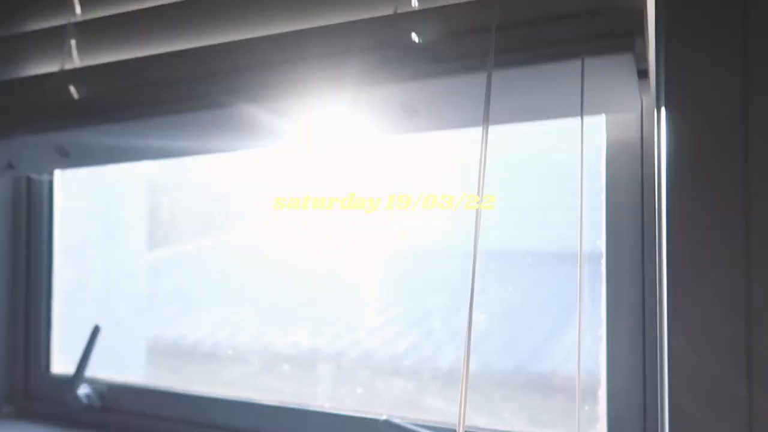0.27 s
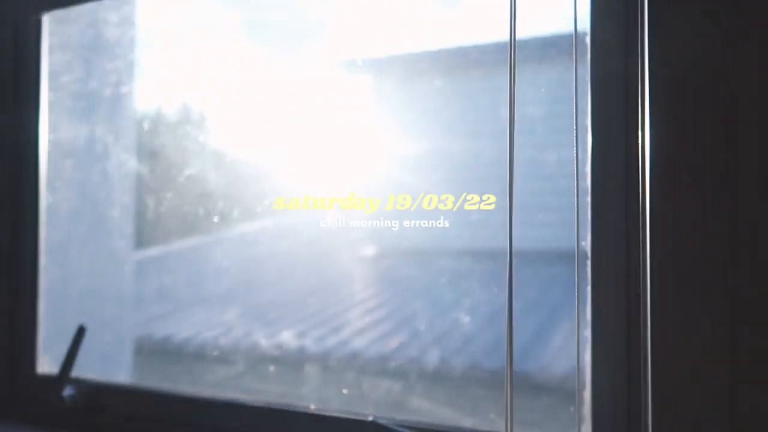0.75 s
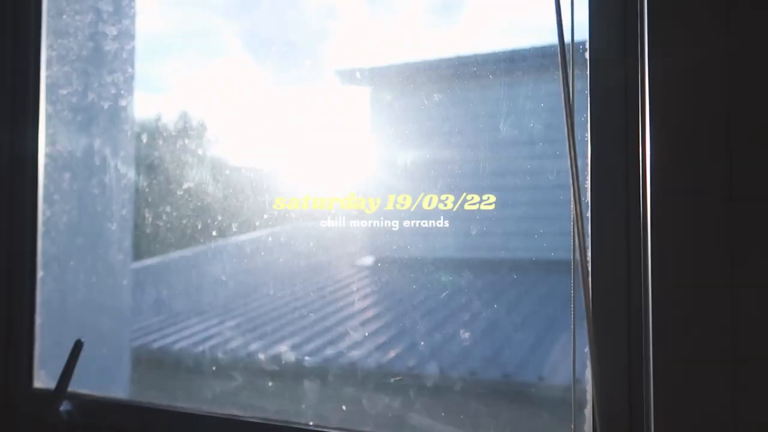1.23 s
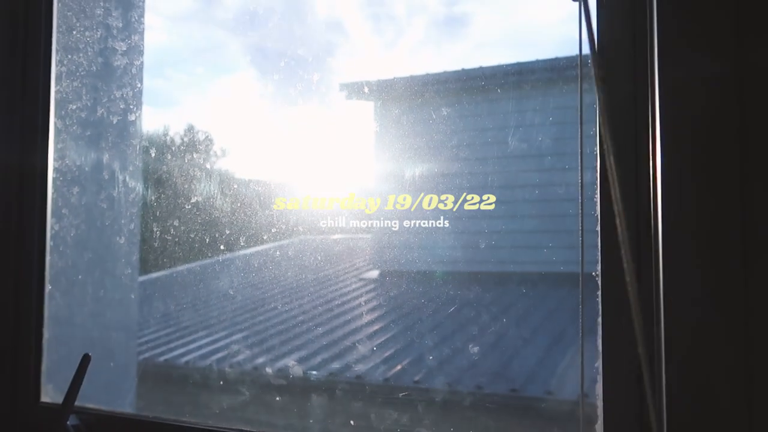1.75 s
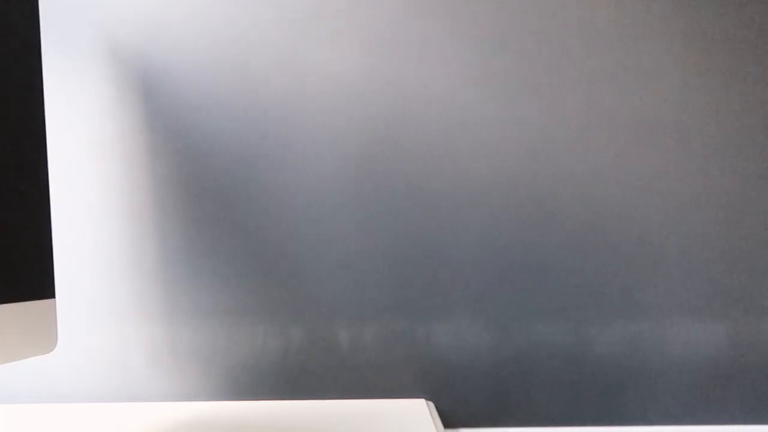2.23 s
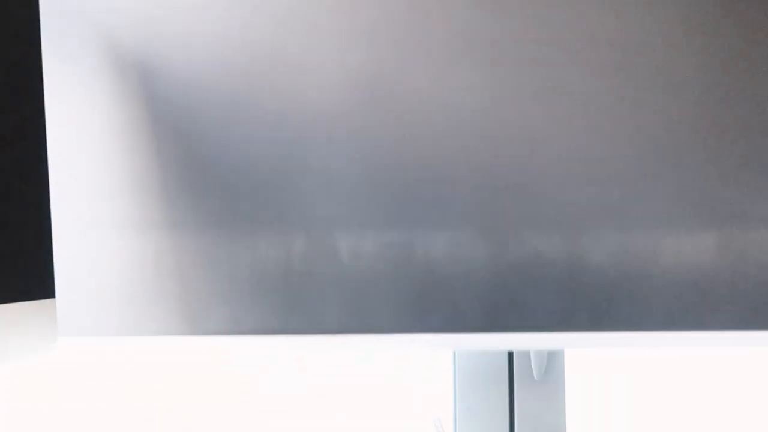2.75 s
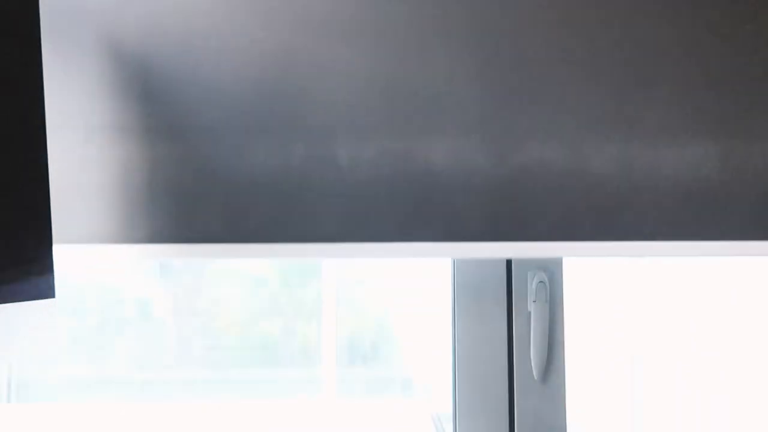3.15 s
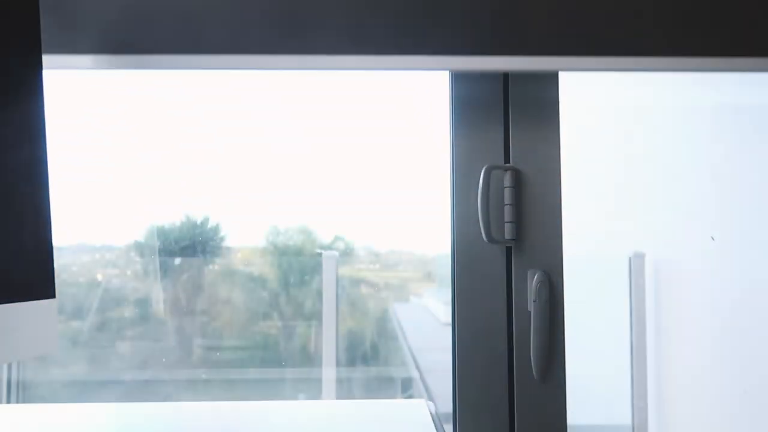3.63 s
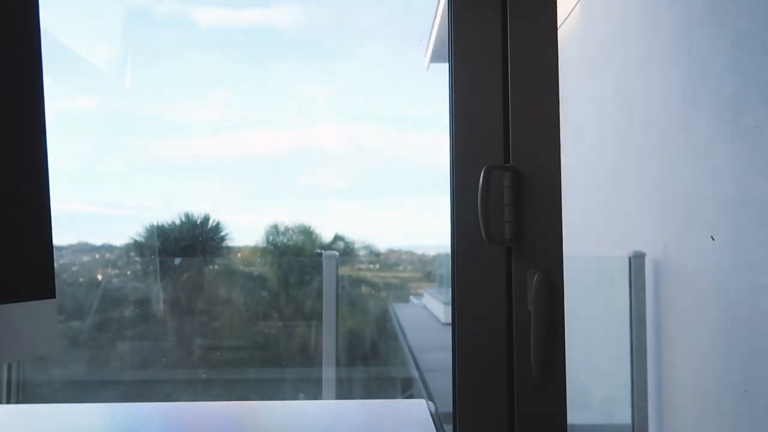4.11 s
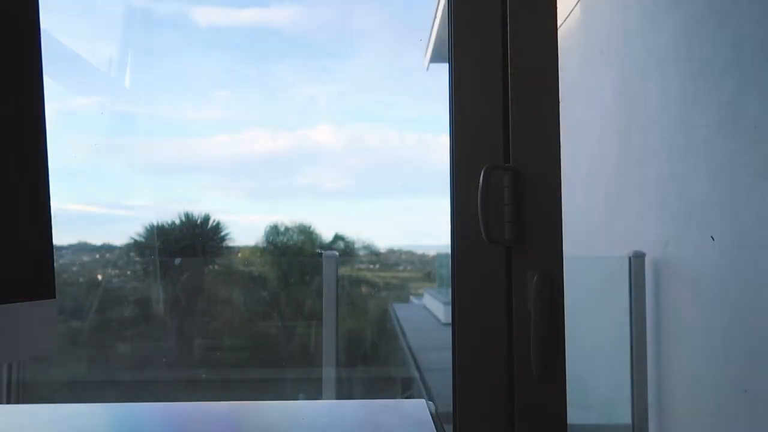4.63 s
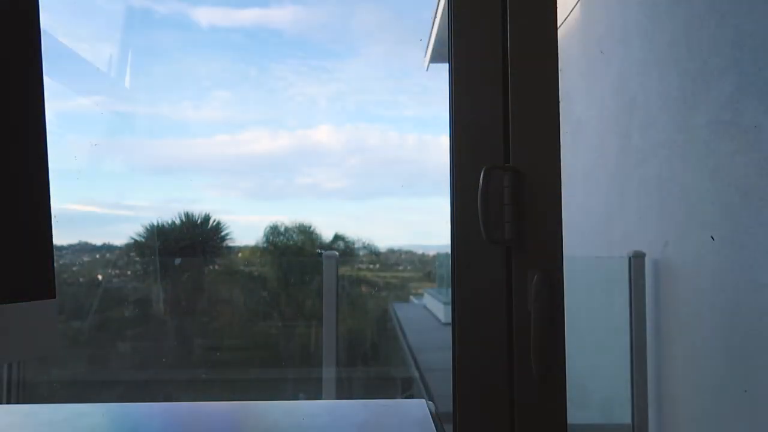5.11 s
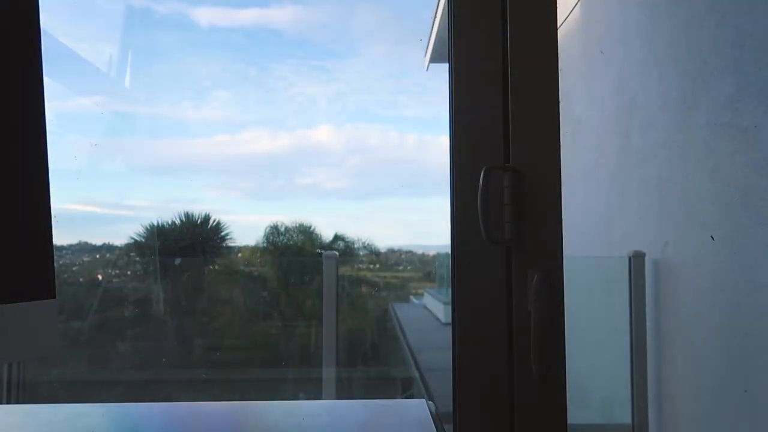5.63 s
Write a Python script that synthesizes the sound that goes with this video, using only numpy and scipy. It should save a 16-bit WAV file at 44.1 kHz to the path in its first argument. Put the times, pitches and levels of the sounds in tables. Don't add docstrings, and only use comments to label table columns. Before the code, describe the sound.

Close indoor handling: slats clatter and cord squeaks, a quiet pause, then a jerky chain-driven roller blind rasps, jolts and knocks its frame.

```python
import sys
import numpy as np
from scipy import signal
from scipy.fft import rfft, irfft, next_fast_len
from scipy.io import wavfile
from scipy.ndimage import uniform_filter1d

SR = 44100
rng = np.random.default_rng(int(sys.argv[2]) if len(sys.argv) > 2 else 0)


def elevation(decibels):
    levels = np.asarray(decibels, float)
    return 10 ** (levels / 20)


def put_to_file(sound):
    columns = np.atleast_2d(sound).T
    safe = np.clip(columns, -1, 1)
    whole_steps = np.round(safe * 32767)
    wavfile.write(sys.argv[1], SR, whole_steps.astype(np.int16))


N = 258514
TIME = np.arange(N) / SR
CUT_S = 2.14
FADE_FROM_S, FADE_DB_PER_S = 5.786, -110
AIR_DB = -52.5
HOLD = 1.274
HARD_T60_S, SOFTER_S_PER_DB = 0.043, 0.5
RAIL_DAMP_S = 0.66
BAR_HZ, BEAD_HZ, COG_HZ = 2040, 2500, 3050

# start/s, length/s, peak level/dB, brightness/dB, swell/share of length
CORD_HAULS = [
    (-.04, 0.086, -27.5, 6.5, 0.35),
    (-.04, 0.55, -32, 6, 0.1),
    (.2, 0.63, -33.5, 3, 0.43),
    (.5, 0.69, -38.5, 3, .5),
    (.95, .45, -39.5, 1.5, 0.68),
    (1.22, 0.13, -39.5, 9.5, 0.8),
    (1.33, 0.15, -34.5, -4, 0.34),
    (1.45, 0.22, -60, 5, .1),
    (1.93, 0.28, -38.5, -5.5, 0.69),
]
# start/s, length/s, peak level/dB, brightness/dB, swell/share of length
CHAIN_PULLS = [(2.14, 0.12, -35.5, -1.5, 0.033), (2.2, 0.29, -38.5, 10.5, 0.74),
               (2.38, 0.19, -39, 12.5, 0.35), (2.56, 0.3, -46, 6, 0.39), (2.75, 0.33, -42, -0.5, 0.082),
               (3.05, 0.21, -48, -4, 0.31), (3.18, 0.19, -38, -2, 0.33), (3.3, 0.12, -41, 3, 0.32),
               (3.385, .17, -33, 0.5, 0.056), (3.46, 0.22, -28, 1, 0.61), (3.64, 0.2, -35.5, 6.5, .55),
               (3.77, .19, -33, 0, 0.3), (3.92, 0.3, -35.5, 8, 0.31), (4.212, .18, -35.5, -1, 0.2),
               (4.36, 0.34, -40, 0.5, 0.37), (4.652, .13, -35.5, 13, 0.056), (4.762, 0.25, -31, 5.5, 0.054),
               (4.8, 0.23, -29.5, 2, 0.38), (5.16, 0.27, -38, -2.5, 0.59), (5.392, 0.17, -30.5, -6.5, 0.16),
               (5.578, 0.082, -34.5, -12, 0.33), (5.66, 0.16, -45, -32, .5)]
# start/s, length/s, peak level/dB, brightness/dB, swell/share of length
SLEEVE_BRUSH = [
    (0.97, 0.39, -42.5, 0, 0.8),
]
RUB_EDGES_HZ = [30, 250, 1500, 3500, 16000]
# level re stroke/dB, slope/dB per dB brightness, steepness/1, rest level/dB
CORD_ANSWER = [
    (-14.5, -0.5, 1.1, -64),
    (0.74, -0.21, 1.1, -73),
    (-0.37, 0.43, 1.14, -71),
    (-8.5, 0.85, 1.5, -87),
]
CHAIN_ANSWER = [
    (-10.5, -0.41, 0.76, -45.5),
    (-0.64, -0.1, 1.2, -51),
    (-3.5, 0.4, 1.02, -50.5),
    (-13.5, 1, 0.94, -63),
]
# f/Hz, level/dB per Hz
RAIL_COLOUR = [(59, -51), (100, -19), (123, -19), (181, -10.5), (258, -15.5), (370, -2.5), (490, -10.5),
               (600, -13), (774, 4), (1370, -10.5), (1880, -17), (2320, -7), (5070, -27.5), (6260, -21),
               (15500, -53.5)]
# f/Hz, level/dB per Hz
TUBE_COLOUR = [(18, -43), (30, -13), (59, 1), (173, -7), (208, -3), (243, -5.5), (532, 1), (691, 1.5),
               (1050, -5), (1650, -22.5), (2990, -26.5), (7460, -41), (15500, -57)]
RAIL_MODES_HZ = [767, 818, 858, 1040]
# t/s, crack level/dB, ring f/Hz, body level/dB, snap level re crack/dB
SLAT_CLICKS = [(.0385, -17, 2510, -40, -18), (.052, -34, 2310, -46, -12), (.0952, -32, 2440, -37, -10),
               (.1173, -25, 2370, -31, -12), (.2164, -25, 3300, -42, -4), (.2566, -19, 2240, -36, -12),
               (.3318, -22, 2410, -31, -7), (.4439, -30, 2380, -39, -8), (.4594, -26, 2420, -40, -8),
               (.4746, -18, 2480, -22.5, 8.5), (.6026, -10.5, 2620, -25, 3), (.6769, -26, 2310, -31, -9),
               (.6988, -25, 2500, -36, -6), (.9175, -32, 1400, -35, -6), (.9358, -36, 2420, -33, -8),
               (1.0215, -24, 2500, -35.5, -10), (1.077, -35, 2400, -49, -8), (1.1014, -38, 2420, -56, -8),
               (1.161, -33, 2500, -36, -6), (1.346, -30, 2260, -27, 8), (1.3614, -30, 1640, -21.5, 2),
               (1.3733, -34, 1760, -21, -4), (1.3972, -29, 2080, -19.5, -3),
               (2.1215, -16.5, 2250, -24, -22)]
# t/s, crack level/dB, body level/dB, snap level re crack/dB
BAR_TAPS = [(2.5151, -26, -24, 0), (2.6543, -28.5, -42, -4), (2.8364, -39, -48, -6),
            (3.2465, -35.5, -25.5, -7), (4.9406, -16, -38, -9), (5.1377, -9.5, -18, -15),
            (5.2823, -27, -45, -2), (5.3217, -29, -34.5, -10), (5.3986, -41, -37, 6),
            (5.5861, -29, -33.5, -15), (5.6265, -34.5, -33, -25)]
BEAD_CATCHES = [(2.2602, -31, -33.5, -4), (2.2896, -30, -55, -11), (2.4143, -29, -56, -11),
                (2.777, -37, -31, 2), (3.0274, -41, -42, -13), (3.1347, -34.5, -52, -12),
                (3.3931, -37, -36.5, -10), (3.9464, -24.5, -39, -12), (3.9997, -25, -48, -5),
                (4.0297, -21.5, -33, -30), (4.2207, -30, -33, -6), (4.2442, -27, -25, -10),
                (4.4103, -31, -42, 1), (4.5749, -29.5, -52, -23), (4.6592, -24, -47, -22)]
COG_CLICKS = [
    (3.5258, -30, -32, -4),
    (3.6693, -26.5, -48, -10),
    (3.7536, -34, -34, -10),
    (3.7723, -23.5, -40, -10),
    (3.8185, -23, -46, -10),
    (3.8429, -27, -41, -12),
    (4.096, -22.5, -35, -31),
    (4.2826, -28, -27.5, 5),
    (4.7685, -23.5, -46, -27),
    (4.9685, -20, -46, -4),
]
# t/s, peak level/dB
BAR_KNOCKS = [
    (2.5154, -13),
    (5.1381, -10.5),
]
# f/Hz, level/dB, t60/s
BAR_MODES = [
    [(77.5, -3, 0.33), (135.3, 1.5, 0.2), (217, 0, 0.15), (402, -1, 0.17), (957, -4, 0.091)],
    [(139.5, -6, 0.19), (372, -4, 0.22), (415, -9, 0.19), (553, -35, 5.0), (653, -7, 0.14),
     (947, -18, 0.28), (1550, -25, 1.1), (1760, -25, 0.047), (933, -17, 0.19), (1030, -15, .2),
     (2140, -18, .1)],
]
# f/Hz, level/dB per Hz
THUD_COLOURS = [
    [(29, -35), (50, 0), (119, -4), (361, -4), (700, -12.5), (1120, -21), (1650, -13.5), (9000, -49),
     (11700, -101), (19800, -120)],
    [(29, -51), (50, -37), (125, -8), (385, -8), (473, -7.5), (780, -6.5), (4910, -29.5), (12000, -51),
     (15600, -104), (22000, -120)],
]
# f/Hz, level/dB, t60/s
BAR_EDGES = [
    (1080, -4.5, 0.027),
    (2095, 6.5, 0.017),
]
# t/s, peak level/dB, f/Hz, t60/s
TUBE_JOLTS = [(2.305, -29, 380, .08), (2.375, -27, 360, .1), (2.518, -15, 1000, .03),
              (2.654, -30, 900, .02), (2.7745, -19, 520, 0.014), (3.213, -23, 406, 0.029),
              (3.2475, -21, 700, .02), (3.257, -22, 435, 0.027), (3.39, -20.5, 1025, 0.046),
              (3.5955, -12, 1200, .008), (4.245, -23, 900, .02), (4.422, -22, 557, 0.053),
              (5.235, -25.5, 135, .15), (5.405, -26.5, 119, 0.16)]
# t/s, level/dB, length/s, fade/share of length
CHAIN_TUGS = [
    (3.527, -32.5, 0.1, 0.22),
    (3.767, -36.5, 0.26, 0.67),
    (4.658, -27, 0.13, 0.73),
    (4.759, -41.5, 0.23, 0.28),
    (5.395, -35.5, 0.16, 0.82),
]
# t/s, peak level/dB, f/Hz, length/s, glide/share of f
SQUEAKS = [
    (.232, -25, 1098, 0.053, 0.1),
    (.362, -28, 1241, 0.041, 0.32),
    (.49, -27.5, 1312, 0.035, 0.038),
    (.62, -25.5, 1350, 0.042, -0.084),
    (.752, -21, 1327, 0.0382, 0.274),
    (.911, -24, 1322, 0.043, -0.21),
]
# t/s, peak level/dB, f/Hz, length/s, glide/share of f
GUIDE_WHISTLES = [
    (.602, -32.5, 8590, 0.0097, -0.0013),
    (1.133, -33.5, 1760, 0.037, 0.033),
    (1.235, -43, 4040, 0.031, 0.037),
    (1.438, -31.5, 2317, 0.02, -0.012),
    (1.46, -35.5, 2320, 0.016, 0.014),
    (1.96, -40, 930, 0.19, 0.083),
    (3.8, -42, 3500, .08, -.03),
    (5.428, -31, 2630, 0.026, 0.023),
]
# t/s, peak level/dB, f/Hz, length/s, glide/share of f
RAIL_HUMS = [(.004, -29.5, 790, 0.15, 0.028), (.055, -36.5, 379.3, 0.1, .02), (.155, -29, 749, 0.067, .02),
             (.2, -40, 352, .11, -0.014), (.255, -28.5, 865, .06, 0), (.315, -33.5, 793, 0.066, -0.027),
             (.39, -34, 857, .06, 0.097), (.46, -36.5, 807, .05, .08), (.53, -35, 870, 0.11, 0.062),
             (.69, -33, 857, 0.045, .05), (.73, -30.5, 860, 0.04, 0.052), (1.358, -22, 1010, .012, -0.2),
             (1.366, -18, 847, 0.023, -0.028), (1.395, -19.5, 823, 0.018, -0.068),
             (1.42, -34, 1000, 0.022, 0.22)]
# t/s, level/dB, length/s
EDGE_FLICKS = [
    (0.034, -24, 0.0033),
    (0.118, -27, 0.003),
    (2.119, -34, 0.011),
    (2.289, -43, 0.0092),
    (2.776, -43, .008),
    (3.386, -41, 0.012),
    (3.772, -33.5, 0.025),
    (3.944, -32.5, 0.011),
]
# t/s, peak level/dB, f/Hz, t60/s
PAWL_PINGS = [(.0340, -24, 7630, .006), (.0343, -24, 9890, .008), (.0346, -24, 11600, .008),
              (.0388, -25, 11700, .008), (.0398, -24, 7040, .015), (.0402, -27, 8160, .008),
              (.0545, -33, 11000, .006), (.1172, -30, 7400, .006), (.1176, -30, 12500, .006),
              (.2575, -28, 7000, .01), (.2164, -30, 5500, .01), (.4747, -17, 4200, .006),
              (.4749, -19, 1500, .012), (.6035, -18, 2720, .03), (.6988, -30, 5800, .012),
              (1.3455, -24, 2400, .02), (1.351, -21, 1500, .02), (1.359, -25, 2100, .015),
              (1.404, -31, 3700, .02), (1.406, -25, 2300, .02), (2.445, -28, 2600, .015),
              (3.7726, -30, 4800, .01), (3.7935, -35, 9000, .008), (3.8185, -28, 4500, .01),
              (3.8429, -27, 3500, .02), (3.86, -30, 3400, .02), (3.9495, -33, 7500, .012),
              (3.9996, -29, 4400, .012), (4.0295, -29, 4800, .008), (4.0964, -29, 3500, .012),
              (4.9688, -19, 3000, .015), (5.3985, -29, 3800, .02)]
# f/Hz, level/dB per Hz
AIR_COLOUR = [(18, -28), (30, -6.5), (105, -3), (123, -5.5), (399, -13), (492, -17), (787, -12),
              (7460, -34.5), (11000, -58), (15500, -58)]
# t/s, peak level/dB
MOTOR_TICKS = [
    (1.5576, -57),
    (1.6254, -60),
    (1.6643, -60),
    (1.7477, -61),
    (1.8035, -61),
    (1.821, -60),
    (1.844, -59),
    (1.9238, -71),
    (1.9642, -58),
    (1.994, -62),
]
# f/Hz, level/dB
SIDE_SLATS = [(60, -23), (110, -21), (200, -11), (380, -12), (700, -21), (1290, -14), (2380, -12.5),
              (4400, -4), (8120, 0), (15000, 0)]
SIDE_ROLLER = [(60, -21), (110, -24), (200, -22), (380, -18), (700, -17.5), (1290, -12.5), (2380, -11),
               (4400, -3.5), (8120, 3), (15000, 2)]
# f/Hz, level/dB
SUM_SLATS = [(8000, -0.5), (10500, -2.5), (12000, -1), (15500, -9)]
SUM_ROLLER = [(8000, -1), (10000, -3), (11500, -7), (15500, -12)]


def level(x, db=0):
    return x * elevation(db) / np.sqrt(np.mean(x ** 2, axis=-1, keepdims=True))


def shape(x, points):
    size = 4096
    hz, db = np.transpose(points)
    grid = np.log(np.arange(size // 2 + 1) * SR / size + 1)
    cep = irfft(np.interp(grid, np.log(hz + 1), db) * np.log(10) / 20)
    cep[1:size // 2] *= 2
    cep[size // 2 + 1:] = 0
    impulse = irfft(np.exp(rfft(cep)))
    long = next_fast_len(x.shape[-1] + size, real=True)
    return irfft(rfft(x, long) * rfft(impulse, long), long)[..., :x.shape[-1]]


def band(x, lo_hz, hi_hz, order=3):
    return signal.sosfilt(signal.butter(order, [lo_hz, hi_hz], "band", fs=SR, output="sos"), x)


def walk(rate_hz):
    k = int(SR / rate_hz)
    return uniform_filter1d(np.repeat(rng.standard_normal(N // k + 1), k), k)[:N]


def add(out, s, x):
    i = max(int(s * SR), 0)
    out[i:i + len(x)] += x[:N - i]


def decay(t60_s, size=13000):
    return np.exp(-np.log(1000) * np.arange(size) / SR / max(t60_s, .004))


def tone(hz, size):
    return np.sin(2 * np.pi * hz * TIME[:size])


def effort(strokes, over_db, per_bright, steep, rest_db):
    power = np.full(N, elevation(2 * rest_db))
    for s, length, db, bright_db, swell in strokes:
        a, b = int(max(s, 0) * SR), int((s + length) * SR)
        u = (TIME[a:b] - s) / length
        swell = np.clip(swell, .01, .99)
        arc = np.clip(HOLD * np.minimum(u / swell, (1 - u) / (1 - swell)), 0, 1)
        power[a:b] += elevation(2 * (db + over_db + per_bright * bright_db)) * arc ** (2 * steep)
    return np.sqrt(power)


def patchy(x, spread_db):
    hz, frames, spec = signal.stft(x, SR, nperseg=512)
    field = uniform_filter1d(rng.standard_normal((30, len(frames))), size=6, axis=1) * np.sqrt(6)
    region = np.clip(3 * np.log2(np.maximum(hz, 40) / 40), 0, 29).astype(int)
    return signal.istft(spec * elevation(spread_db * field[region]), SR, nperseg=512)[1][:N]


def rubbing(strokes, answer, colour, slips_per_s, scatter_db, smooth, jerk_db):
    chance = rng.random((2, N))
    slip = (chance[0] < slips_per_s / SR) * elevation(-scatter_db * np.log(chance[1] + 0.04))
    rattle = signal.lfilter([1], [1, -np.exp(-1 / (0.0017 * SR))], slip)
    grit = rattle * rng.standard_normal(N)
    body = patchy(shape(level(grit) + smooth * rng.standard_normal(N), colour), 2.0)
    jerk = jerk_db * walk(35)
    out = np.zeros(N)
    for lo, hi, row in zip(RUB_EDGES_HZ, RUB_EDGES_HZ[1:], answer):
        unsteady = elevation(jerk * (lo > 100) + 2.0 * walk(18))
        out += level(band(body, lo, hi)) * effort(strokes, *row) * unsteady
    return out


def cord_in_rail():
    rub = rubbing(CORD_HAULS, CORD_ANSWER, RAIL_COLOUR, 600, scatter_db=0.0, smooth=0.9, jerk_db=0.0)
    ring = sum(signal.lfilter(*signal.iirpeak(hz, 25, SR), rub) for hz in RAIL_MODES_HZ)
    return 0.83 * rub + 0.45 * np.exp(-TIME / RAIL_DAMP_S) * ring


def chain_on_roller():
    return rubbing(CHAIN_PULLS, CHAIN_ANSWER, TUBE_COLOUR, 700, scatter_db=3.5, smooth=0.84, jerk_db=0.0)


def clicks(table, crack, body, ring_db):
    out, size = np.zeros(N), 9000
    impulse = 1. * (np.arange(size) == 0)
    snap = shape(impulse, [(500, -10.5), (1400, -1.5), (3000, 7.0), (5000, -6), (9000, -19), (15500, -40)])
    snap /= np.abs(snap).max()
    noise = rng.standard_normal((len(table), 2, size))
    cracks, bodies = level(shape(noise[:, 0], crack), -9.5), level(shape(noise[:, 1], body))
    for (s, crack_db, hz, body_db, snap_db), crackle, dull in zip(table, cracks, bodies):
        t60 = np.clip(HARD_T60_S + SOFTER_S_PER_DB * (-16 - crack_db), .02, .14)
        ring = elevation(ring_db) * tone(hz, size) * decay(.5 * t60, size)
        add(out, s, elevation(crack_db) * (crackle * decay(t60, size) + ring + elevation(snap_db) * snap))
        add(out, s, elevation(body_db) * dull * decay(0.76 * t60, size))
    return out


def slat_clicks():
    crack = [(1000, -9.0), (2500, 0.0), (6000, -2.0), (9000, -17.0), (15000, -33)]
    body = [(300, -17), (800, 16.0), (1700, 5), (3200, -33)]
    return clicks(SLAT_CLICKS, crack, body, -9)


def roller_clicks():
    parts = ((BAR_TAPS, BAR_HZ), (BEAD_CATCHES, BEAD_HZ), (COG_CLICKS, COG_HZ))
    table = [(s, crack_db, hz, body_db, snap_db) for rows, hz in parts for s, crack_db, body_db, snap_db in rows]
    crack = [(1000, 4), (2500, 11.0), (5000, 2.5), (9000, -20), (15000, -26.0)]
    body = [(120, 5.5), (400, 18.5), (1200, 10.5), (2200, -21.5)]
    return clicks(table, crack, body, -10.5)


def bar_knocks():
    out, size = np.zeros(N), 13000
    onset = np.minimum(TIME[:size] / 0.001, 1)
    for (s, db), modes, colour, (edge_hz, edge_db, edge_t60) in zip(
            BAR_KNOCKS, BAR_MODES, THUD_COLOURS, BAR_EDGES):
        ring = sum(elevation(g) * tone(hz, size) * decay(min(t60, .3)) for hz, g, t60 in modes)
        ring *= 0.95 / np.abs(ring).max()
        thud = level(shape(rng.standard_normal(size), colour), -5) * (decay(0.22) + 0.87 * decay(0.022))
        edge = elevation(edge_db) * tone(edge_hz, size) * decay(edge_t60)
        add(out, s, elevation(db) * (ring + thud + edge) * onset)
    return out


def tube_jolts():
    out = np.zeros(N)
    for s, db, hz, t60 in TUBE_JOLTS:
        add(out, s, elevation(db - 3) * tone(hz, 13000) * decay(t60))
    return out


def chain_tugs():
    gain = np.zeros(N)
    colour = [(500, -19), (1500, -3.0), (4000, 8.0), (7000, -2), (10000, -13), (12000, -50), (15000, -58)]
    rasp = level(shape(rng.standard_normal(N), colour)) * elevation(0.86 * walk(150))
    for s, db, length, fade in CHAIN_TUGS:
        u = (TIME - s) / length
        gain += elevation(db) * (u > 0) * np.clip((1 - u) / max(fade, .05), 0, 1) ** 2
    return gain * rasp


def squeaks():
    out, size = np.zeros(N), 8000
    for rows, wobble in ((SQUEAKS, .04), (GUIDE_WHISTLES, .015), (RAIL_HUMS, .012)):
        for s, db, hz, length, glide in rows:
            u = np.minimum(TIME[:size] / max(length, .01), 1)
            rough = uniform_filter1d(rng.standard_normal((2, size)), 90, axis=1) * 11.2
            pitch = hz * (1 + glide * (u - .5) + wobble * rough[0])
            voice = np.sin(2 * np.pi * np.cumsum(pitch) / SR)
            swell = np.sin(np.pi * u) + 0.091 * u * decay(0.052, size)
            add(out, s, elevation(db + 2.12 * rough[1]) * voice * swell)
    return out


def flicks():
    out = np.zeros(N)
    for s, db, length in EDGE_FLICKS:
        rattle = band(rng.standard_normal(2000), 6000, 15500, order=2)
        add(out, s, elevation(db) * rattle * np.clip(1.5 - TIME[:2000] / length, 0, 1))
    return out


def pings():
    out = np.zeros(N)
    for s, db, hz, t60 in PAWL_PINGS:
        add(out, s, elevation(db) * tone(hz, 2000) * decay(t60, 2000))
    return out


def sleeve():
    return level(band(rng.standard_normal(N), 112, 760)) * effort(SLEEVE_BRUSH, 0, 0, 1, -92)


def room_air():
    return level(shape(rng.standard_normal(N), AIR_COLOUR), AIR_DB - 1)


def focus_motor():
    out, size = np.zeros(N), 900
    later = [(CUT_S + .03 * k + 0.0071 * a, -66 + 6 * b) for k, (a, b) in enumerate(rng.random((120, 2)))]
    tap = (tone(3900, size) + 2.3 * tone(5100, size)) * decay(0.012, size)
    for s, db in list(MOTOR_TICKS) + later:
        add(out, s, elevation(db) * tap)
    return out * np.array([[2.2], [-.3]])


def pair(x, side, top, t60_s, wet_db, lead, left):
    tail = rng.standard_normal((3, 13000)) * np.array([decay(t60_s), decay(0.03), decay(0.069)])
    tail /= np.sqrt(np.sum(tail ** 2, axis=1, keepdims=True))
    mid = x + elevation(wet_db) * signal.fftconvolve(x, shape(tail[0], [(200, 3.3), (8000, 0.33)]))[:N]
    turn = np.cumsum(walk(37)) * 150 / SR
    paths = [signal.fftconvolve(mid, t[:2000])[:N] for t in tail[1:]]
    scattered = np.cos(turn) * paths[0] + np.sin(turn) * paths[1]
    long = next_fast_len(N, real=True)
    log_hz = np.log(np.arange(long // 2 + 1) * SR / long + 1)
    side_gain, sum_gain = (elevation(np.interp(log_hz, np.log(np.array(p)[:, 0]), np.array(p)[:, 1]))
                           for p in (side, top))
    direct = 1j * lead + left / (1 + (np.exp(log_hz) / 3500) ** 2)
    rest = np.sqrt(np.maximum(1 - np.abs(direct) ** 2, 0))
    mid_spec = rfft(mid, long)
    diff = irfft((direct * mid_spec + rest * rfft(scattered, long)) * side_gain, long)[:N]
    mid = irfft(mid_spec * sum_gain, long)[:N]
    return np.array([mid + diff, mid - diff])


def scene():
    slats = cord_in_rail() + slat_clicks() + sleeve() + room_air()
    roller = chain_on_roller() + chain_tugs() + roller_clicks() + bar_knocks() + tube_jolts()
    small_parts = squeaks() + flicks() + pings()
    first = pair(slats + small_parts, SIDE_SLATS, SUM_SLATS, 0.32, -8.5, lead=0.27, left=0.31)
    second = pair(roller + small_parts, SIDE_ROLLER, SUM_ROLLER, 0.46, -9.5, lead=0.31, left=0.42)
    return np.where(TIME < CUT_S, first, second) + focus_motor()


def roll_off(x):
    return signal.sosfilt(signal.butter(12, 15760, fs=SR, output="sos"), x)


def record(dry):
    hiss = elevation(-65.5) * rng.standard_normal(dry.shape)
    rounded = .95 * np.tanh(dry / .95)
    faded = rounded * elevation(FADE_DB_PER_S * np.maximum(TIME - FADE_FROM_S, 0))
    return roll_off(band(faded + hiss, 28, 19000, order=2))


dry = scene()
out = record(dry)
put_to_file(out)
```